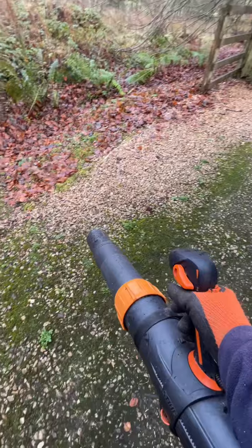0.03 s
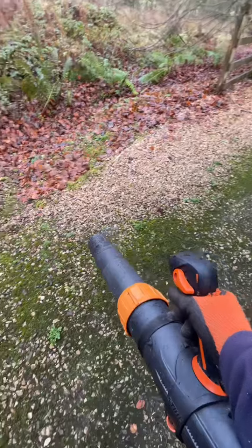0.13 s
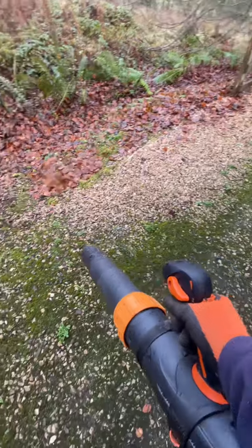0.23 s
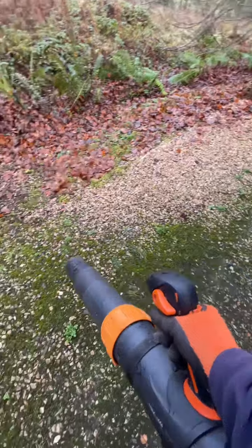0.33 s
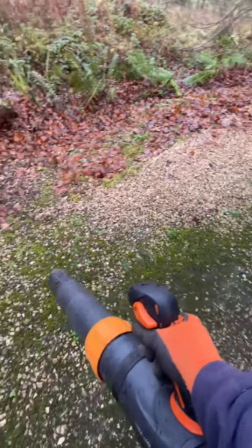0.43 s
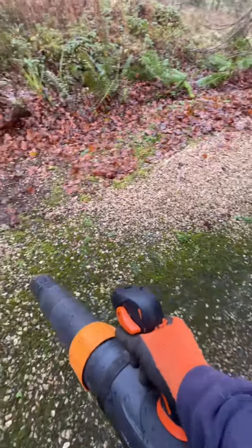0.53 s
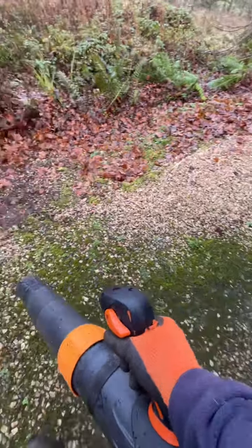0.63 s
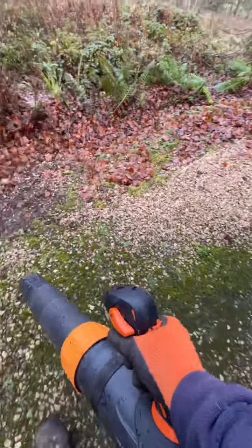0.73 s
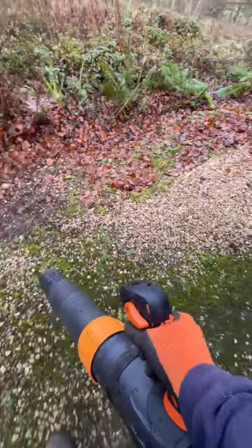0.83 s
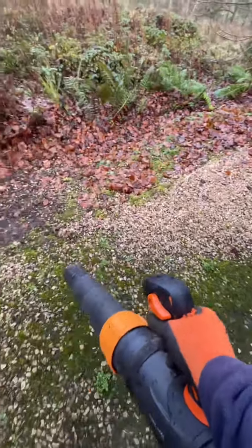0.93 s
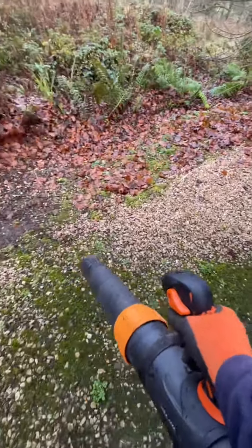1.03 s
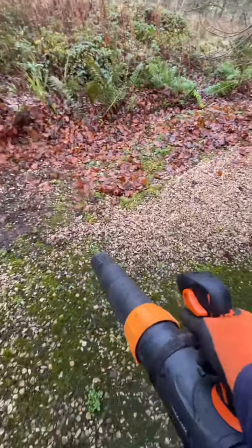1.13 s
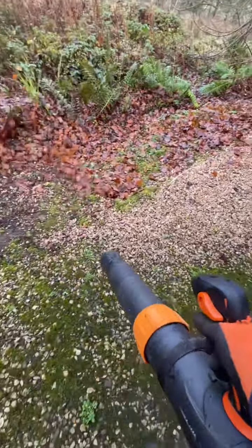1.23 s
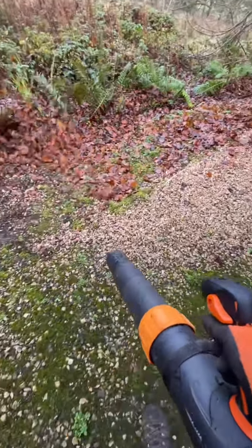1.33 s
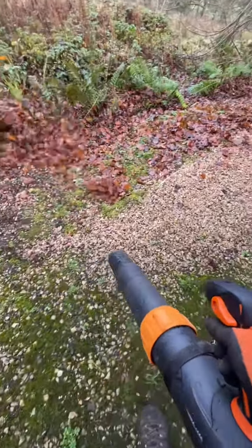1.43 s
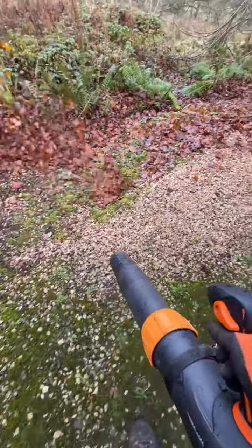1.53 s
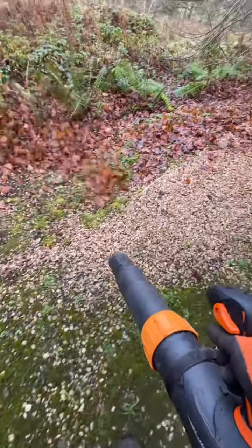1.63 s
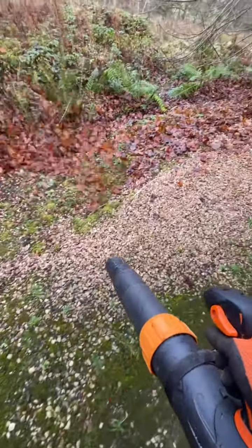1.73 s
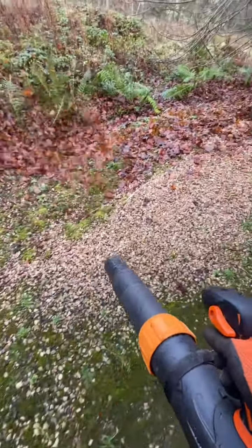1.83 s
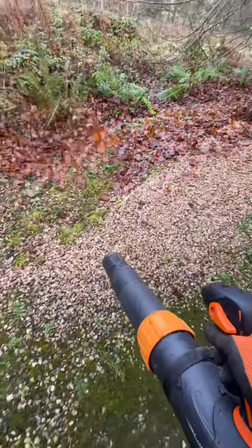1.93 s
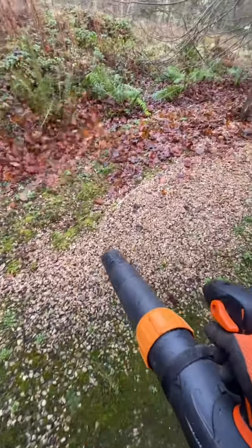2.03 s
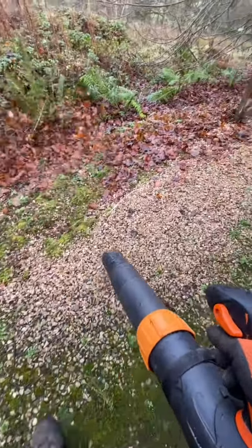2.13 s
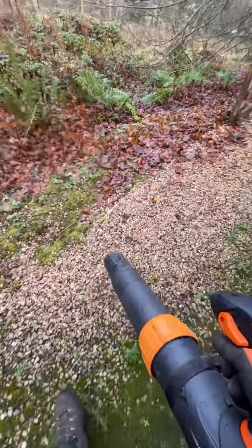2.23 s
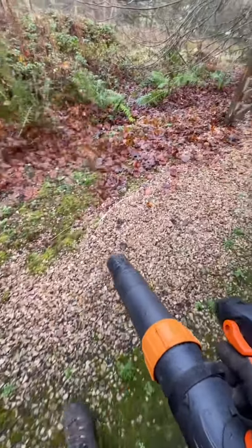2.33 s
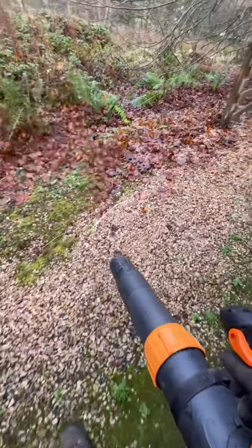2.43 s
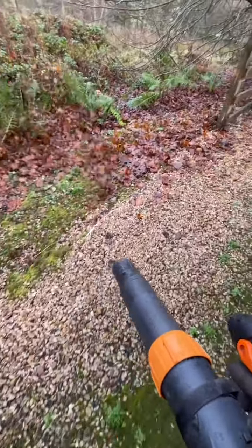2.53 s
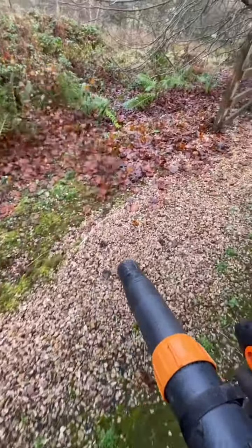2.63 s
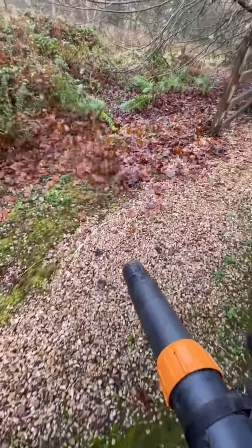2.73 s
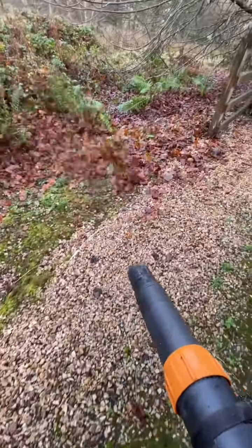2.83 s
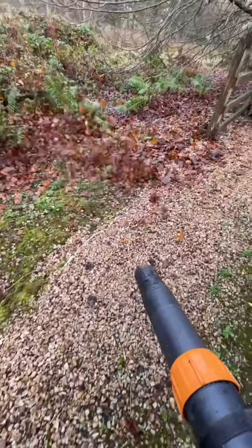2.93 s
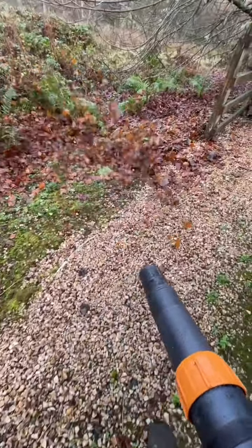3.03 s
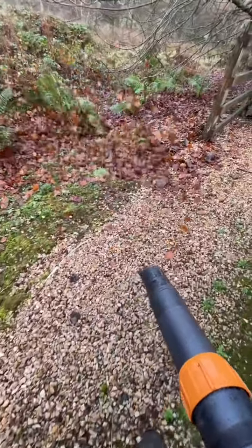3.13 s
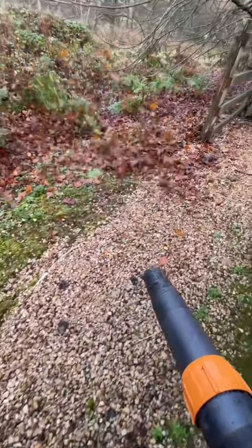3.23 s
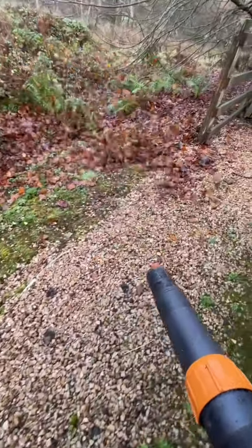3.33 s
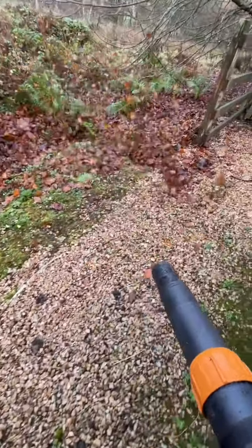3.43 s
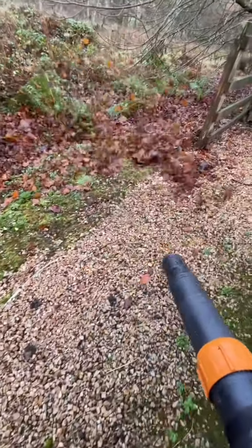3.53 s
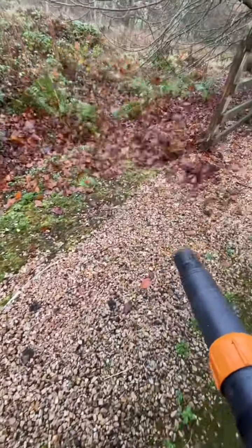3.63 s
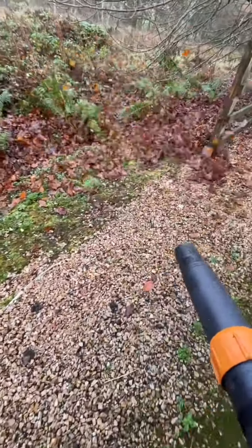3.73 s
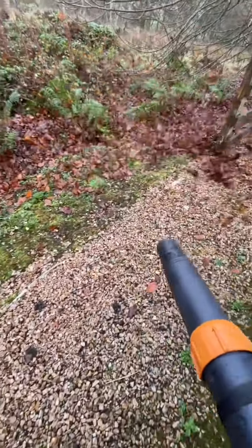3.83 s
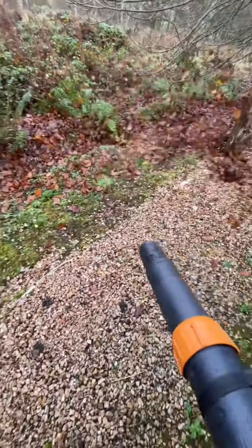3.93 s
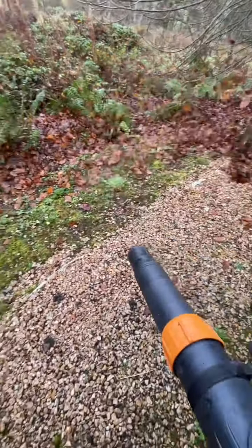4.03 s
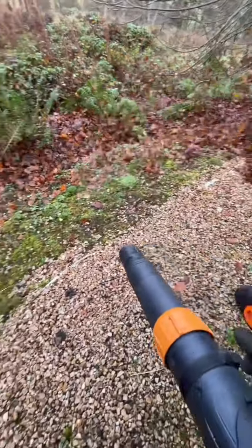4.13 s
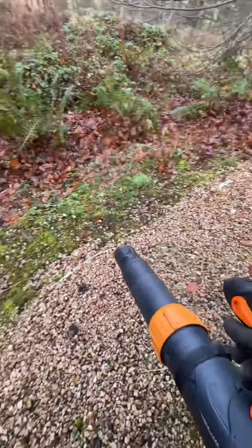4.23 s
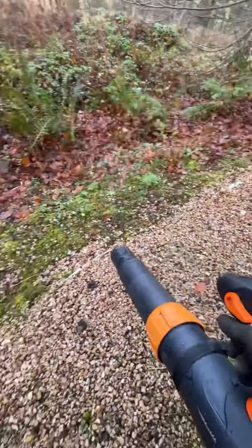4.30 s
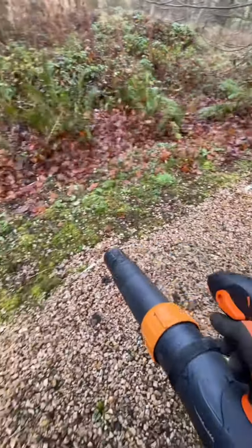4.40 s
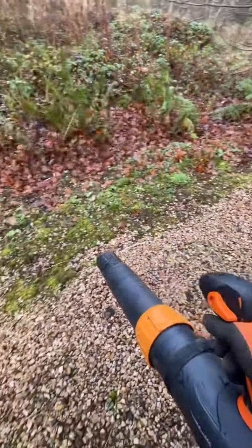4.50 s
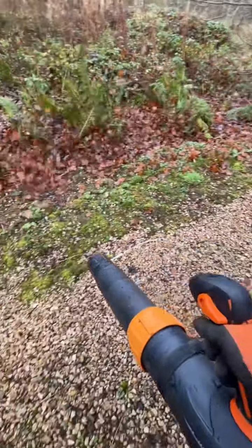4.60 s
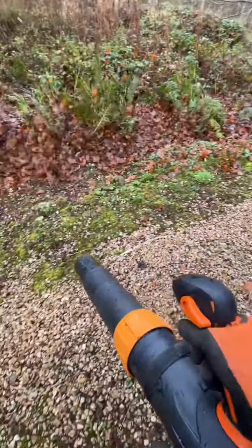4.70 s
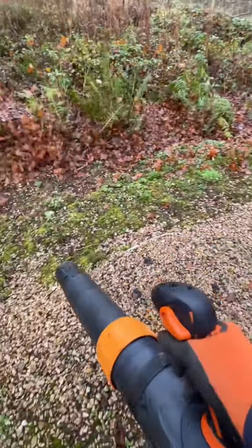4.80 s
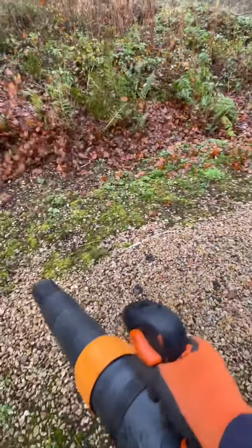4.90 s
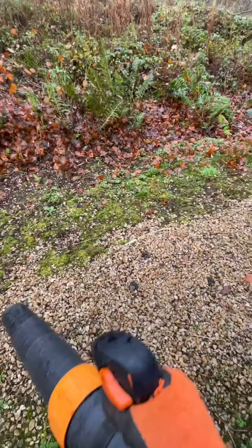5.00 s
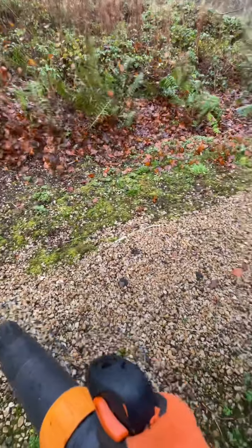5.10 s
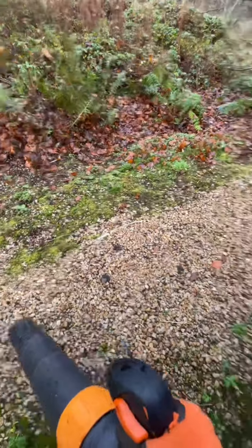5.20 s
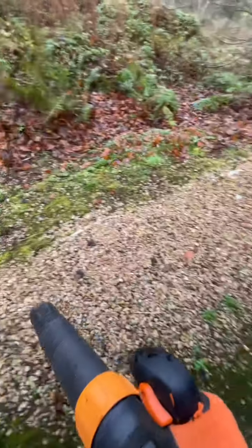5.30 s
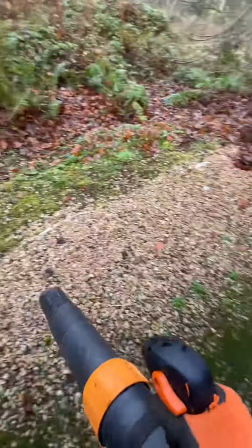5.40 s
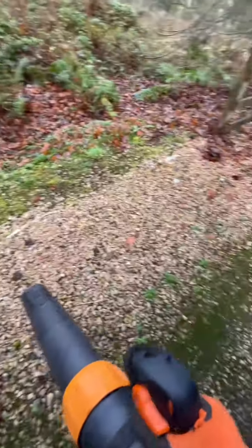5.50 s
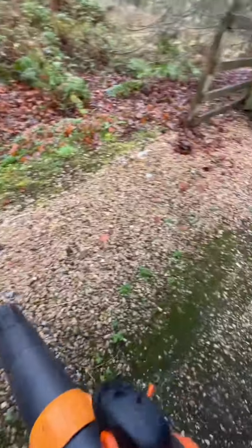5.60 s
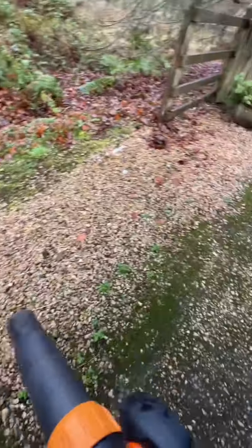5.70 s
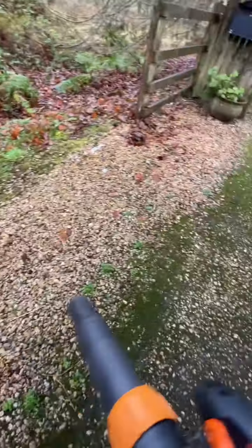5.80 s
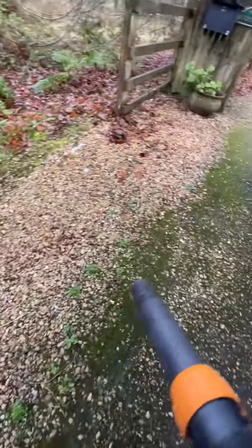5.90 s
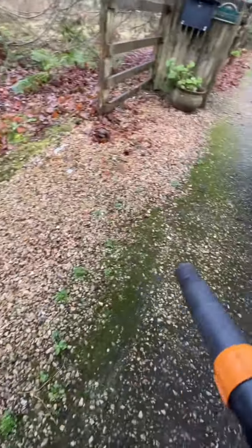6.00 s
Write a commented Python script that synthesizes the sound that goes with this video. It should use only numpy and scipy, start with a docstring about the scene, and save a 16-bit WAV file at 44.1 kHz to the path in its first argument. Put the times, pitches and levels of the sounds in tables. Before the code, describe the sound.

A handheld petrol leaf blower starts with a sudden pop and a gritty, spitting surge of air, revving up within a second. It then holds full throttle: a buzzing engine drone with a light rasp, a thin fan whine and a steady rush of air. Dry leaves tick faintly over gravel underneath. Heard close up outdoors, the tone shifts as the blower swings about.

```python
"""A handheld petrol leaf blower starts abruptly, revs up and runs at full throttle, close by outdoors.
Its small four-stroke engine puffs once a cycle (two shaft turns), making a drone through the muffler.
The valve gear knocks on the casing, and the fan whines on the same shaft. Air rushes out of the tube
and rattles dry leaves over gravel. The sound shifts as the blower is drawn close and swung about."""
import sys
import numpy as np
from scipy import signal
from scipy.fft import rfft, irfft, next_fast_len
from scipy.io import wavfile
from scipy.ndimage import uniform_filter1d, map_coordinates

SR = 44100
rng = np.random.default_rng(int(sys.argv[2]) if len(sys.argv) > 2 else 0)


def log_audio(samples):
    """Write samples as a 16-bit WAV file to the path given in sys.argv[1]."""
    # one column per channel
    frames = np.atleast_2d(samples).T
    # limit to full scale, then quantise
    limited = np.clip(frames, -1, 1)
    pcm = np.round(limited * 32767).astype(np.int16)
    wavfile.write(sys.argv[1], SR, pcm)


N = 266893
TIME = np.arange(N) / SR
START_S = 0.1502
START_HZ, FULL_HZ = 32.15, 59.21  # engine cycles a second: at the start, at full throttle

# How close the blower is held: t/s, nearness (negative is pushed away, positive is drawn close)
NEARNESS = [(0.15, -0.3), (0.5, 0.47), (1.0, 0.9), (1.6, -0.58), (2.4, -0.58), (3.1, -1.5), (3.7, -0.9),
            (4.5, -1.1), (5.3, 0.76), (5.7, 1.1), (6.05, 0.7)]
# Where the blower is swung: t/s, swing (negative is left, positive is right)
SWING = [(0.15, -0.96), (1.0, 0.086), (1.5, -0.24), (2.2, 0.01), (3.2, -0.47), (3.75, 0.24), (4.4, -0.24),
         (5.1, -0.031), (5.45, 0.85), (5.7, 1.3), (6.05, 1.9)]
# Air noise that is the same left and right: f/Hz, level/dB per Hz
AIR_SHARED = [(25, -78), (60, -65), (170, -68.5), (450, -57.5), (700, -59), (850, -64), (1050, -64.5),
              (1400, -70), (2700, -71.5), (3400, -77), (6600, -79), (8500, -90), (11000, -92),
              (15500, -101.7)]
# Air noise that is opposite left and right: f/Hz, level/dB per Hz
AIR_OPPOSED = [(25, -100), (100, -90), (280, -79), (400, -58), (700, -50.5), (830, -65), (1000, -61),
               (1400, -68), (2200, -72.5), (3000, -69.5), (4500, -76.5), (6500, -79), (8000, -79),
               (10000, -88.5), (15500, -99)]
# How the air noise leans to one side: f/Hz, left boost and right cut/dB
AIR_LEAN = [(60, 0.8), (600, 1.0), (1400, -0.44), (2800, -1.3), (7000, 0.46)]
# Resonances (boosted pitches) of the tube and fan housing: f/Hz, width/Hz, boost/dB
TUBE_RESONANCES = [(203, 144, 9), (867, 27, 5.5), (1210, 130, 0), (1432, 43, 10), (1960, 330, 1.5),
                   (2670, 260, 0.5), (5980, 96, 4)]
# Strength of the air jet rushing over the ground: t/s, level/dB
JET_LEVEL = [(0.15, -1), (0.8, 1.2), (1.0, 3.5), (1.25, 3.5), (1.65, 0.6), (2.5, 0), (2.9, -2), (3.25, -1),
             (3.6, -0.4), (3.95, -1), (4.35, -3), (5.05, -1.5), (5.4, 1.5), (5.62, 1), (5.92, 4.5),
             (6.05, 1.5)]
# Bands of air noise that are aimed like beams: f/Hz, width/Hz, boost/dB per nearness, boost/dB per swing
AIR_BEAMS = [(198, 99, 1.5, 7.5), (350, 64, 4.5, -3.5), (660, 91, 1, 2.5), (1066, 200, 3.5, -4.5),
             (1340, 54, 4, -7.5), (1930, 600, 0, 0), (2580, 390, -0.3, -1.5), (3440, 590, 2, -1),
             (5800, 9200, -2.13, 1)]
# Brief swells in bands of the rushing air, a few narrow enough to whistle:
# t/s, length/s, f/Hz, width/Hz, boost/dB
AIR_SWELLS = [(0.21, 0.04, 900, 180, 8), (1.3, 0.4, 2600, 500, 3), (1.95, 0.7, 2600, 600, 2.5),
              (2.3, 0.35, 860, 90, 4), (2.9, 0.25, 1100, 130, 4), (3.17, 0.25, 880, 160, 6),
              (3.33, 0.16, 5700, 400, 4.5), (3.3, 0.9, 3600, 1000, 1.5), (3.3, 1.0, 1600, 900, 3),
              (3.7, 0.3, 5700, 400, 5.5), (3.8, 0.4, 750, 90, 4), (3.95, 0.25, 1850, 600, 4.5),
              (4.2, 0.7, 1130, 150, 3), (4.25, 0.3, 880, 70, 5), (4.35, 0.5, 2500, 800, 2),
              (4.6, 0.5, 840, 130, 2)]
# Tone colour of the ringing engine casing: f/Hz, level/dB
CASING_COLOUR = [(700, 6.5), (1300, -5), (1700, -3), (2200, -7), (3000, -9), (3800, -24), (5000, -10),
                 (6500, -9), (10000, -29)]
# How tones reach the two ears: f/Hz, left minus right level/dB, left phase lead/rad
EAR_DIFFERENCES = [(60, 0, 0), (120, 1, 0), (178, 3, 0), (297, 0.5, 0.1), (356, -5, -0.7),
                   (416, 3.5, -0.25), (475, 9, -2.5), (535, 8, 1.2), (594, 2.5, -1.7), (654, 7, -1.8),
                   (713, 0, -1.5), (773, 1, -1.4), (1150, -5, -1.5), (1450, 4, -1.8)]
# Fan tones: harmonic (multiple of the engine's cycle rate), level/dB
FAN_TONES = [(17, -69), (18, -74), (19, -76), (20, -47), (21, -49), (23, -46), (24, -57.5), (25, -51),
             (36, -48), (48, -50)]
# Resonances and dips of the muffler and housing: f/Hz, width/Hz, boost/dB
MUFFLER_RESONANCES = [(89.5, 52, 14), (136, 32, -15.5), (171, 25, 4.5), (252, 45, 7), (392.6, 69, -10.5),
                      (542, 87, 13.5), (627, 95, 16), (694, 16, 11)]
# Engine tones: harmonic, revving level/dB, full-speed level/dB, boost/dB per nearness, boost/dB per swing
ENGINE_TONES = [(1, -36, -40, 2, 1.5), (2, -23, -25, 2, 4.5), (3, -35.5, -33.5, 0.9, -1.7),
                (4, -21.5, -46.5, -2, -4.5), (5, -26.5, -30, 1.65, -0.5), (6, -45.5, -30, 7.5, -6.5),
                (7, -18, -26.5, 5.5, 1), (8, -31.5, -41.5, -2.5, 3.5), (9, -21.5, -42.5, -1.5, 11),
                (10, -44, -49, 2.5, 1), (11, -50, -35, -4.5, -4.5), (12, -33.5, -44, -3, 0),
                (13, -36.5, -50.5, 7.5, 7), (14, -38, -45, -2.5, 7), (15, -38, -47.5, 0.5, -4.5),
                (16, -39, -54, 6, 3.5)]
# Engine tones that follow their own level curves instead, by harmonic: t/s, left level/dB, right level/dB
LEAD_TONES = {7: [(0.16, -32, -32), (0.22, -18, -19), (0.32, -23, -28), (0.4, -23.5, -29), (0.55, -29, -36),
              (0.7, -38, -30), (1.0, -21.5, -38), (1.45, -18, -23), (1.85, -19, -25), (2.5, -22.3, -25),
              (2.9, -22.5, -24), (3.25, -23.5, -26), (3.4, -20.5, -20.5), (4.6, -23.5, -28),
              (5.05, -18, -24), (5.5, -21, -28.5), (6.0, -19.5, -20)], 9: [(0.16, -30, -38),
              (0.28, -27, -35), (0.39, -23, -33), (0.47, -21, -38), (0.58, -26, -25), (0.85, -24.5, -38),
              (1.28, -23, -33), (1.48, -15, -29), (1.9, -20, -39), (2.4, -23.5, -44), (3.1, -20, -29),
              (3.4, -21, -32.5), (4.0, -20.5, -24.5), (4.15, -23, -43), (4.95, -23.5, -29), (5.2, -16, -22),
              (5.52, -22.5, -25), (5.72, -16.8, -17.5), (6.0, -17.3, -19)], 10: [(0.16, -32, -33),
              (0.3, -38, -42), (0.38, -20, -34), (0.49, -36, -32), (0.62, -34, -27), (0.84, -23, -21),
              (0.96, -30, -27), (1.5, -23.5, -31), (2.05, -29, -34), (2.5, -36, -44), (3.85, -29, -36),
              (4.3, -33, -32), (5.05, -26.5, -35), (6.0, -41, -42)], 11: [(0.16, -43, -42),
              (0.34, -30, -30), (0.46, -24, -27), (0.76, -25, -27), (0.88, -26, -26), (1.0, -56, -41),
              (1.12, -23.5, -22.5), (1.5, -20, -22.5), (2.05, -20, -25.5), (2.5, -25, -33),
              (3.25, -22, -31), (3.4, -21, -32), (3.85, -20.5, -41), (4.45, -25.5, -29), (5.05, -19.5, -24),
              (5.3, -26, -31), (6.0, -25, -44)], 12: [(0.16, -41, -34), (0.3, -34, -37), (0.4, -16.5, -18),
              (0.54, -20, -17.5), (0.65, -12, -13.5), (0.82, -21.5, -25.5), (1.0, -25, -26),
              (1.18, -37, -42), (2.35, -52, -48), (3.4, -50, -42), (3.6, -35, -39), (4.1, -34.5, -29),
              (4.4, -51, -43), (5.05, -41, -43), (6.0, -32, -33)], 13: [(0.16, -46, -44), (0.5, -23, -31),
              (0.7, -47, -48), (1.6, -35, -39), (2.1, -40, -33), (2.6, -45, -48), (3.0, -38, -37),
              (3.4, -41, -38), (3.75, -29, -33), (4.25, -37, -37), (4.6, -49, -60), (5.7, -33, -36),
              (6.0, -42, -44)], 14: [(0.16, -48, -49), (1.0, -47, -35), (1.8, -33, -33.5), (2.35, -34, -33),
              (2.75, -39, -36), (3.2, -28, -32), (3.8, -53, -43), (4.25, -40, -35), (5.2, -44, -38.5),
              (5.7, -37, -32), (6.0, -43, -42)], 15: [(0.16, -39, -42), (0.72, -36, -44), (1.0, -48, -50),
              (2.6, -48, -48), (3.0, -37, -36), (3.7, -50, -45), (4.3, -34, -33), (4.7, -49, -51),
              (6.0, -43, -43)]}
# Strength of the exhaust, for the engine tones outside LEAD_TONES: t/s, level/dB
EXHAUST_LEVEL = [(0.15, -0.5), (0.4, -2.5), (0.95, 0), (1.5, 2), (2.0, 1.5), (2.5, 0), (3.6, 0.5), (4.5, 1),
                 (5.2, -1), (5.6, -2), (6.05, -6)]


def amp(db):
    """Turns decibels into a gain to multiply by."""
    return 10 ** (np.asarray(db) / 20)


def unit_rms(x):
    """Scales a signal so that its average strength (rms) is 1."""
    return x / np.sqrt(np.mean(x ** 2) + 1e-20)


def curves(rows, at):
    """Looks up a table by its first column, joining the rows with straight lines."""
    first, *columns = np.transpose(rows)
    return [np.interp(at, first, column) for column in columns]


def pose(t):
    """The blower's nearness and swing at the given times."""
    return curves(NEARNESS, t)[0], curves(SWING, t)[0]


def spectrum(points, hz):
    """Reads a table of f/Hz, level/dB along a pitch (log-frequency) scale."""
    f, db = np.transpose(points)
    return np.interp(np.log(hz + 1), np.log(f + 1), db)


def resonance_db(modes, hz):
    """Adds up resonances, each strongest at its own frequency."""
    return sum(db / (1 + (2 * (hz - f) / width) ** 2) for f, width, db in modes)


def wander(rate_hz):
    """A smooth random wobble of strength 1, changing up to the given rate."""
    steps = TIME * 2 * rate_hz
    return unit_rms(map_coordinates(rng.standard_normal(4096), [steps], order=1, mode="wrap"))


def ears(level_db, hz, apart=1):
    """Shares a tone's strength between left and right; apart (0-1) is how much they differ."""
    ratio = amp(curves(EAR_DIFFERENCES, hz)[0] * apart)
    return amp(level_db) * np.sqrt(2 / (1 + ratio ** 2)) * np.array([ratio, np.ones(N)])


def tone(rms, angle, hz, apart=1, echo_db=-18, echo_rate_hz=1.23):
    """One stereo tone. A shifting echo off ground and operator bends its phase, most on the weak side."""
    lead = curves(EAR_DIFFERENCES, hz)[1] * apart
    echo = amp(echo_db) * np.minimum(hz / 500, 1) * rms.max(0)
    echo = echo * np.array([wander(echo_rate_hz), wander(echo_rate_hz)])
    bend = 2 * np.arctan(echo / rms / 2)
    return np.sqrt(2) * rms * np.cos(angle + np.array([lead, -lead]) / 2 + bend)


def leaves(level_db=-55, ticks_per_s=400, spread_db=3, ring_s=0.00054):
    """Dry leaves and grit tick against the gravel, fading in after the jet starts."""
    t, out = np.arange(400) / SR, np.zeros((2, N))
    pitches = np.geomspace(2500, 10000, 12)
    for hz in pitches:
        hits = rng.random(N) < ticks_per_s / len(pitches) / SR
        hits = hits * amp(spread_db * np.minimum(rng.exponential(1, N), 4))
        phase = rng.uniform(0, 2 * np.pi, (2, 1))
        tick = t * np.exp(-t / ring_s) * np.sin(2 * np.pi * hz * t + phase) / hz
        out += signal.oaconvolve(hits[None], tick, axes=1)[:, :N]
    return amp(level_db) * unit_rms(out) * np.clip(TIME - .3, 0, 1)


def air_levels(t, surge_peak_s=0.21, spit_db=5, spit_s=0.22):
    """Boosts in dB for the low roar, middle rush and high hiss: the air surges as the throttle opens."""
    since = np.maximum(t - START_S, 0)
    age = since / surge_peak_s
    surge = (age * np.exp(1 - age)) ** 0.95  # quick rise to 1, slower fall
    spit = spit_db * np.exp(-since / spit_s)  # the first firings spit
    near, swing = pose(t)
    jet, = curves(JET_LEVEL, t)
    roar = -2.5 + 1.5 * near - 3.5 * swing + 9 * surge ** 1.25 + spit  # its surge dies soonest
    rush = jet + 6 * surge
    hiss = 0.8 * jet + 7 * surge + spit
    return roar, rush, hiss


def spits(hz, cycles, depth_db=7.5, grit_db=2, rise_cycles=0.13, uneven=0.08):
    """Gain for the air noise: each firing makes a gritty spit, fading out as the engine gains speed."""
    speed = np.clip((hz - START_HZ) / (FULL_HZ - START_HZ), 0, 1)
    firing = cycles + 1.26 + 0.16 * speed  # earlier in the cycle as speed builds
    age = firing % 1 / rise_cycles
    strength = 1 + uneven * rng.standard_normal(1024)[firing.astype(int)]
    burst = strength * age * np.exp(1 - age)
    burst_db = depth_db * (burst - 0.42) + grit_db * burst * wander(300)
    return amp((1 - speed) ** 0.55 * burst_db)


def air(cycles, spit, roar_throb=0.1, hiss_throb=0.018, shaft_throb=0.019, flicker_db=0.76):
    """Swirling air roars, rushes and hisses out of the tube, throbbing as the engine pumps it."""
    size = next_fast_len(N)
    hz = np.fft.rfftfreq(size, 1 / SR)
    noise = rfft(rng.standard_normal((2, size))) * np.sqrt(SR / 2)
    noise *= amp(resonance_db(TUBE_RESONANCES, hz))
    shared, opposed = noise * amp([spectrum(AIR_SHARED, hz), spectrum(AIR_OPPOSED, hz)])
    lean_db = spectrum(AIR_LEAN, hz)
    stereo = np.array([(shared + opposed) * amp(lean_db), (shared - opposed) * amp(-lean_db)])
    low, high = 1 / (1 + (hz / 900) ** 6), 1 - 1 / (1 + (hz / 3200) ** 6)
    roar, rush, hiss = (irfft(stereo * band, size)[:, :N] for band in (low, 1 - low - high, high))
    roar_db, rush_db, hiss_db = air_levels(TIME)
    roar_beat = 1 + roar_throb * np.cos(2 * np.pi * (cycles - 0.15))
    hiss_beat = 1 + hiss_throb * np.cos(2 * np.pi * (cycles - 0.93))
    shaft_beat = 1 + shaft_throb * np.cos(4 * np.pi * (cycles - 0.087))  # twice a cycle
    roar = roar * amp(roar_db) * roar_beat
    rush = rush * amp(rush_db) * spit ** 0.19 * shaft_beat
    hiss = hiss * amp(hiss_db) * hiss_beat * spit * shaft_beat
    return (roar + rush + hiss) * amp(flicker_db * wander(22))


def air_colour(air_noise, patchy_db=2.0):
    """Beamed bands of air noise shift as the blower moves; other bands swell briefly or drift at random."""
    hz, t, slices = signal.stft(air_noise, SR, nperseg=1024)
    hz = hz[:, None]
    roar_db, _, hiss_db = air_levels(t)
    near, swing = pose(t)
    beams = [(f, width, near_db * near + swing_db * swing) for f, width, near_db, swing_db in AIR_BEAMS]
    db = resonance_db(beams, hz)
    for at, length, f, width, boost_db in AIR_SWELLS:
        db += boost_db * np.exp(-(2 * (t - at) / length) ** 2 - (2 * (hz - f) / width) ** 2)
    db += 0.56 * hiss_db * np.exp(-((hz - 7800) / 1300) ** 2)  # strong hiss is also brighter
    db -= 0.22 * roar_db * np.exp(-((hz - 760) / 170) ** 2)  # strong roar is also deeper
    patches = uniform_filter1d(rng.standard_normal(slices.shape[1:]), size=5, axis=0)
    patches = uniform_filter1d(patches, size=18, axis=1)
    db += patchy_db * unit_rms(patches)
    return signal.istft(slices * amp(db), SR, nperseg=1024)[1][:, :N]


def valve_rasp(cycles, settled, start_db=-39, rise_db=3, ring_s=0.011, knock_at=0.6):
    """The valve gear knocks the casing once a cycle; the colour of the ringing slowly drifts."""
    count = np.floor(cycles - knock_at)
    at = np.flatnonzero(np.diff(count) > 0)
    late = (count[at + 1] + knock_at - cycles[at]) / (cycles[at + 1] - cycles[at])
    knocks = np.zeros(N)
    knocks[at], knocks[at + 1] = 1 - late, late  # each knock falls between two samples
    t, hz = np.arange(1024) / SR, np.fft.rfftfreq(1024, 1 / SR)
    out = np.zeros((2, N))
    for side in range(3):
        noise = rfft(rng.standard_normal((2, len(t))))
        ring = irfft(noise * amp(spectrum(CASING_COLOUR, hz))) * np.exp(-t / ring_s)
        blend = np.cos(TIME * 1.42 + side * np.pi / 3)
        out += signal.oaconvolve(knocks[None], ring, axes=1)[:, :N] * blend
    jet_db, = curves(JET_LEVEL, TIME)
    return amp(start_db + settled * (rise_db + 0.19 * jet_db)) * unit_rms(out)


def fan_whine(hz, cycles, flutter_db=2, smear_rad=0.36, near_db=-1.6, swing_db=2):
    """The fan's thin tones follow the shaft, flutter in the stirred air and grow with speed."""
    out = np.zeros((2, N))
    for k, db in FAN_TONES:
        angle = 2 * np.pi * (k * cycles + rng.random()) + smear_rad * wander(9)
        rms = ears(db + flutter_db * wander(2.6), k * hz)
        out += tone(rms, angle, k * hz)
    near, swing = pose(TIME)
    return out * hz / hz.max() * amp(near_db * near + swing_db * swing)


def engine_speed(spin_up_s=0.358, creep_hz_per_s=0.073, hunt_hz=0.052):
    """The engine revs up: gives cycles a second, cycles done so far, and how settled it is (0-1)."""
    since = np.maximum(TIME - START_S, 0)
    shortfall_hz = (FULL_HZ - START_HZ) * np.exp(-(since / spin_up_s) ** 1.247)
    hz = FULL_HZ - shortfall_hz + creep_hz_per_s * since
    settled = np.clip((hz - 55) / 4, 0, 1)
    jitter = np.interp(settled, [0, 1], [0.0027, 0.00076]) * wander(25)  # slightly uneven firings
    hz = hz + hunt_hz * wander(2)
    return hz, np.cumsum(hz) / SR + jitter, settled


def first_firing(pop_db=4, pop_s=0.00096, lull_db=-3, lull_after_s=0.017, lull_s=0.0037):
    """Overall gain: silence, the pop of the first firing, a short lull, and a quick fade at the end."""
    since = TIME - START_S
    gate = np.clip(since / .0002, 0, 1) * np.clip((TIME[-1] - TIME) / .002, 0, 1)
    pop = pop_db * np.exp(-abs(since) / pop_s)
    lull = lull_db * np.exp(-((since - lull_after_s) / lull_s) ** 2)
    return gate * amp(pop + lull)


def muffler(t, hz, settled):
    """Gives harmonics, levels and phases: tones climb through the resonances and shift with the pose."""
    harmonics, revving_db, full_db, near_db, swing_db = np.transpose(ENGINE_TONES)[:, :, None]
    near, swing = pose(t)
    db = revving_db + (full_db - revving_db) * settled + resonance_db(MUFFLER_RESONANCES, harmonics * hz)
    db = db + near_db * near + swing_db * swing
    # these phases put each puff first and its ringing after
    log_gain = np.log(amp(np.vstack([db[:1] - 29.0, db, db[-1:], db[-1:]])))
    phase = -signal.hilbert(np.vstack([log_gain, log_gain[-2:0:-1]]), axis=0).imag[1:]
    phase = uniform_filter1d(phase, size=50, axis=1) + np.pi / 2  # the sound leads the gas flow
    return harmonics[:, 0], db, phase


def engine_drone(hz, cycles, settled, puff_at=0.114, waver_db=0.54, ragged_db=3.5, smear_rad=0.21):
    """Exhaust and intake puff once a cycle: low tones are firm, high ones turn ragged in the moving air."""
    t = TIME[::256]
    harmonics, levels, phases = muffler(t, hz[::256], settled[::256])
    exhaust_db, = curves(EXHAUST_LEVEL, TIME)
    uneven_db = (0.15 + 0.24 * settled) * wander(28)
    swing, = curves(SWING, TIME)
    apart = 0.94 - 0.45 * np.clip(swing, 0, 1) ** 2  # swung right, it sits between the ears
    out = np.zeros((2, N))
    for k, level_db, phase in zip(harmonics, levels, phases):
        ragged = np.clip((k * hz - 690) / 80, 0, 1)  # sets in above the muffler's resonances
        wobble_db = waver_db * wander(12) + ragged * ragged_db * wander(20)
        if k in LEAD_TONES:
            rms = amp(curves(LEAD_TONES[k], TIME))
        else:
            drift_db = 0.12 * k * settled * wander(1.0)
            rms = ears(exhaust_db + np.interp(TIME, t, level_db) + drift_db, k * hz, apart)
        angle = 2 * np.pi * k * (cycles - puff_at) + np.interp(TIME, t, phase)
        angle += ragged * smear_rad * wander(22)
        out += tone(rms * amp(uneven_db + wobble_db), angle, k * FULL_HZ, apart)
    return out


def scene():
    """One engine speed drives the drone, whine, rasp and throbbing air; leaves tick underneath."""
    hz, cycles, settled = engine_speed()
    motor = engine_drone(hz, cycles, settled) + fan_whine(hz, cycles) + valve_rasp(cycles, settled)
    jet = air_colour(air(cycles, spits(hz, cycles)))
    return (motor + jet + leaves()) * first_firing()


def record(dry, ceiling=0.95, cutoff_hz=15800):
    """Rounds off the highest peaks, then removes the very top of the treble."""
    rounded = dry / (1 + (dry / ceiling) ** 8) ** (1 / 8)
    lowpass = signal.firwin(511, cutoff_hz, window=("kaiser", 9), fs=SR)
    return signal.oaconvolve(rounded, lowpass[None], "same")


dry = scene()
out = record(dry)
log_audio(out)
```